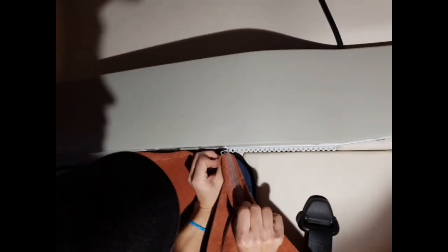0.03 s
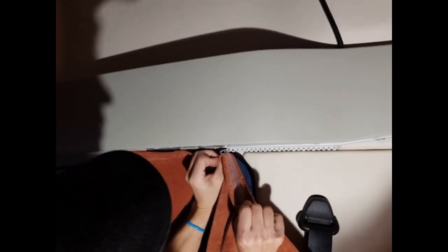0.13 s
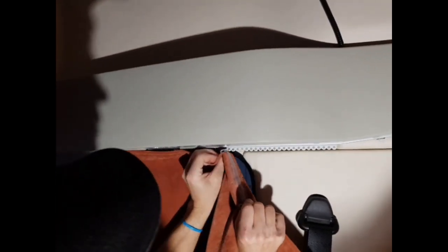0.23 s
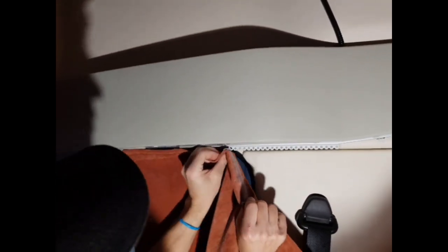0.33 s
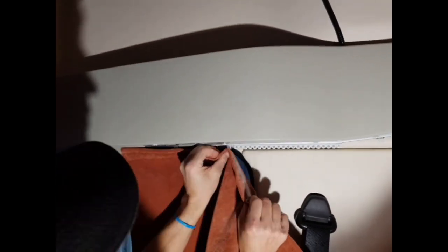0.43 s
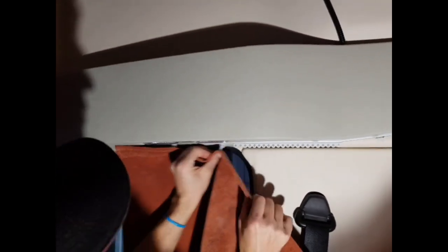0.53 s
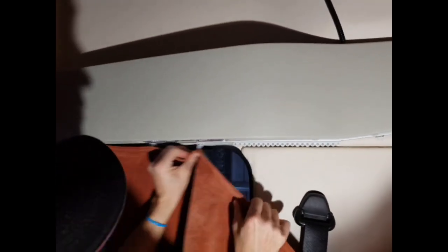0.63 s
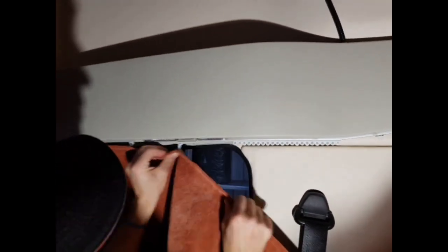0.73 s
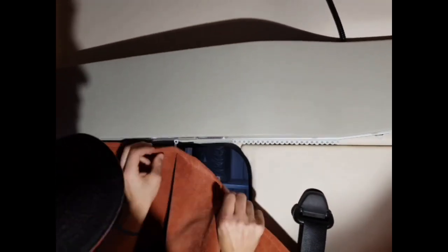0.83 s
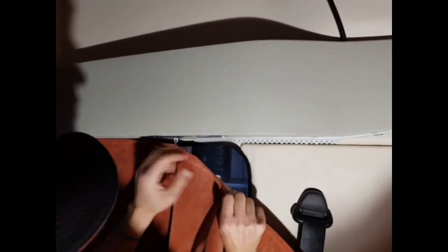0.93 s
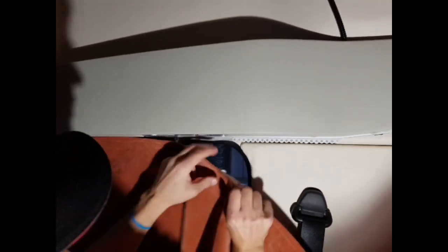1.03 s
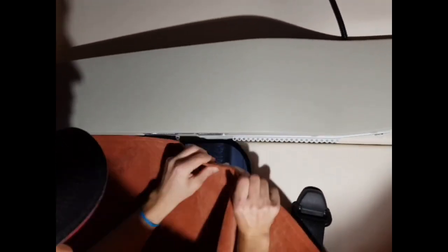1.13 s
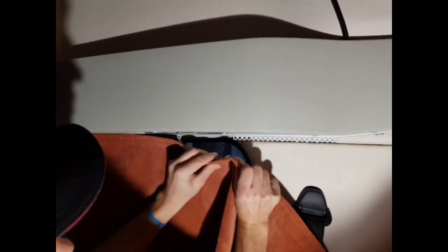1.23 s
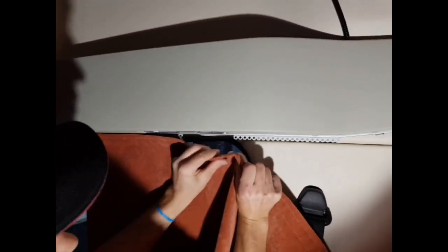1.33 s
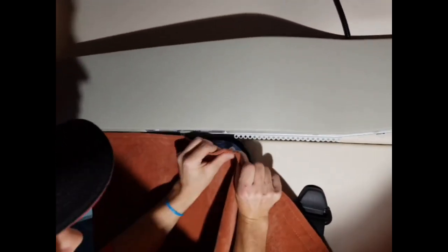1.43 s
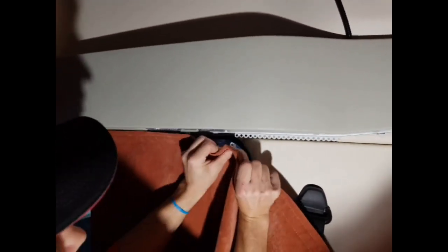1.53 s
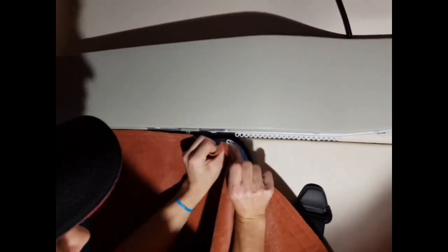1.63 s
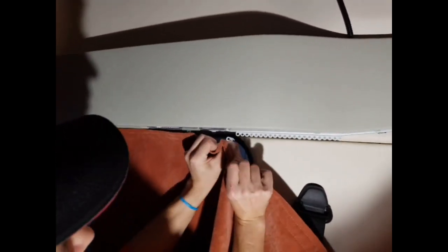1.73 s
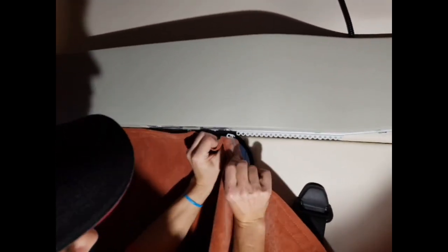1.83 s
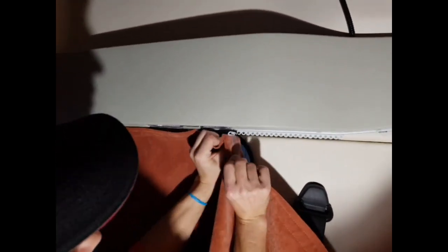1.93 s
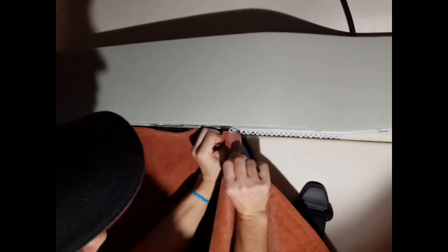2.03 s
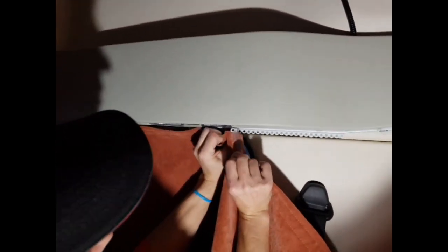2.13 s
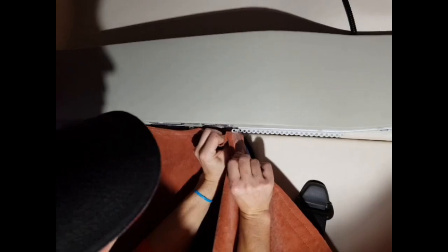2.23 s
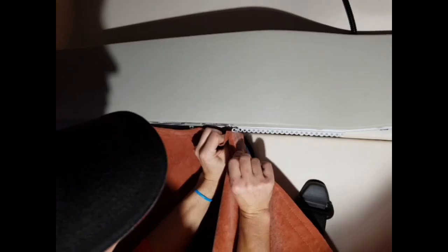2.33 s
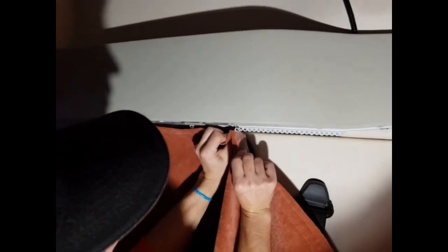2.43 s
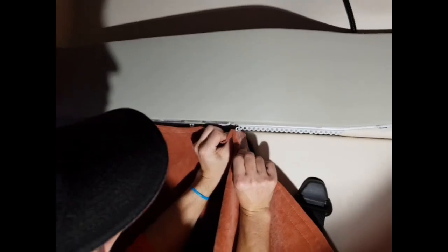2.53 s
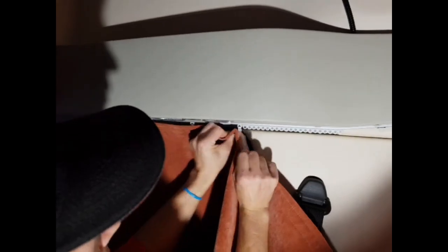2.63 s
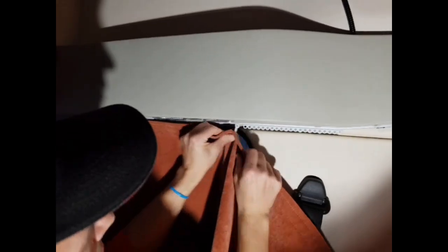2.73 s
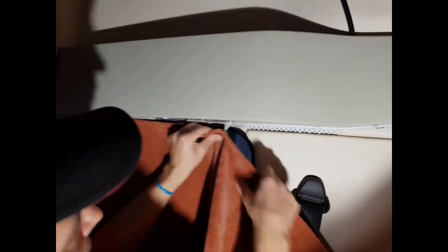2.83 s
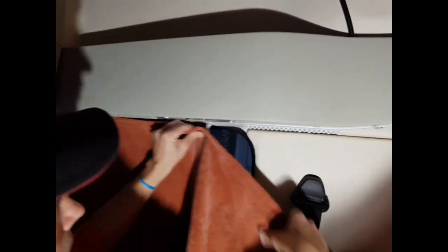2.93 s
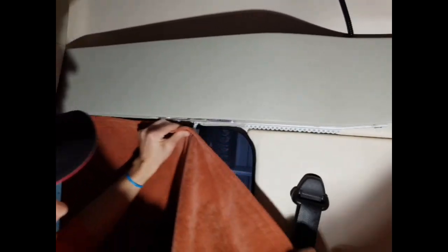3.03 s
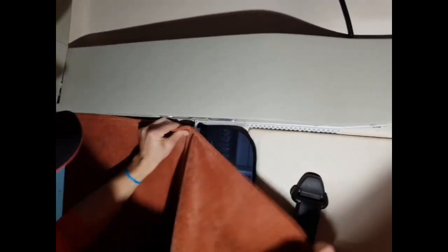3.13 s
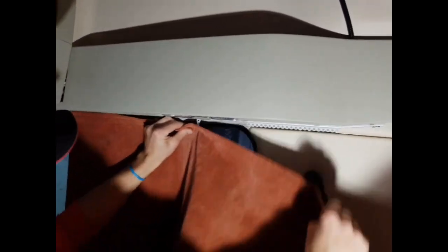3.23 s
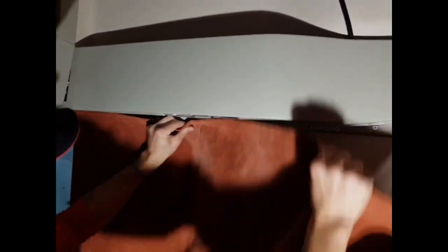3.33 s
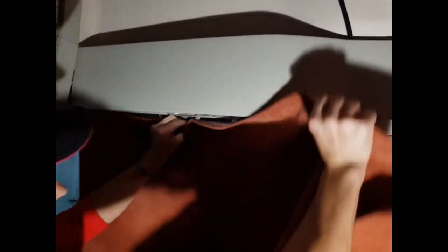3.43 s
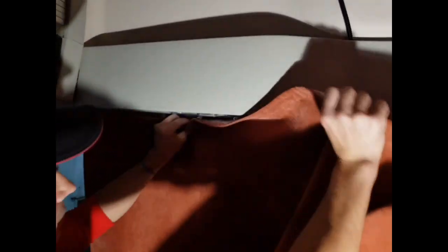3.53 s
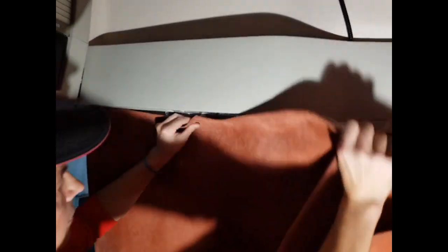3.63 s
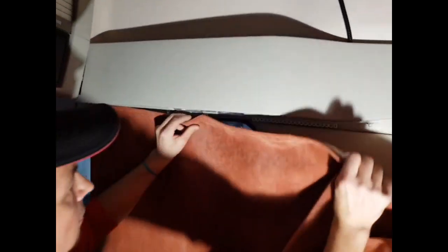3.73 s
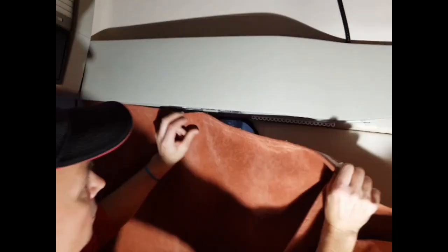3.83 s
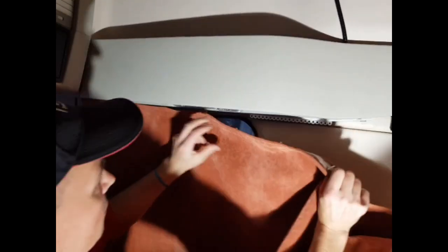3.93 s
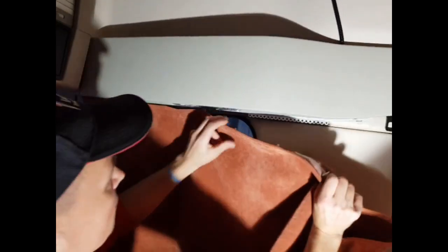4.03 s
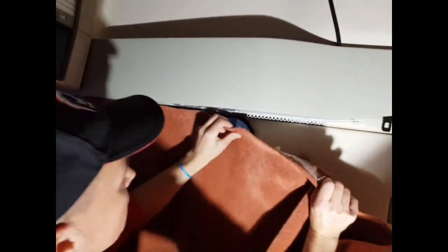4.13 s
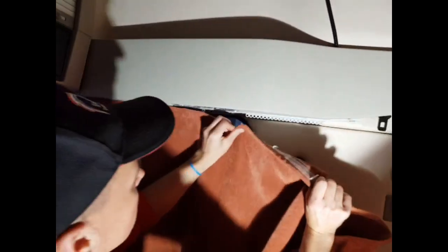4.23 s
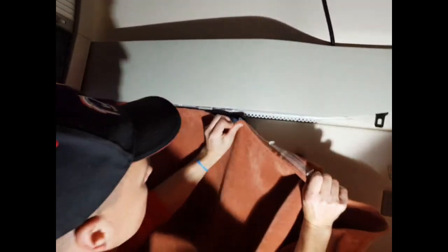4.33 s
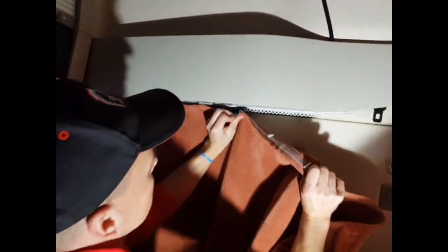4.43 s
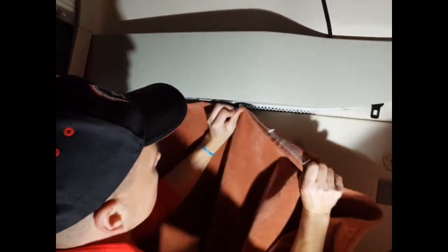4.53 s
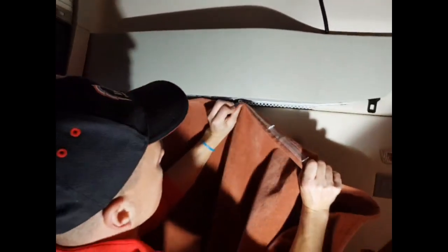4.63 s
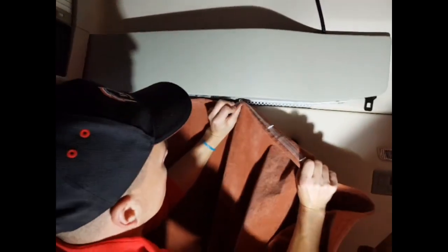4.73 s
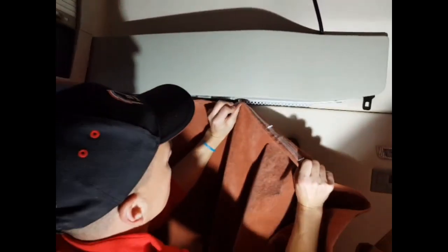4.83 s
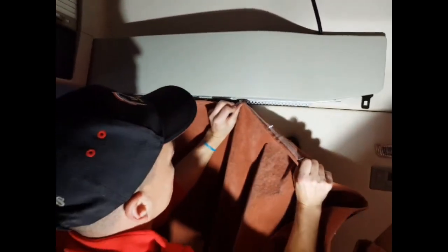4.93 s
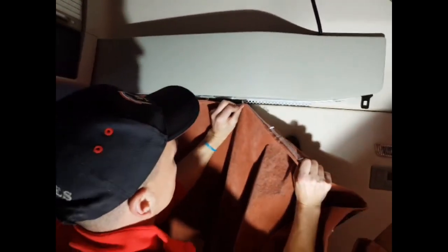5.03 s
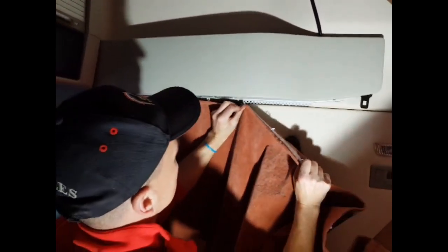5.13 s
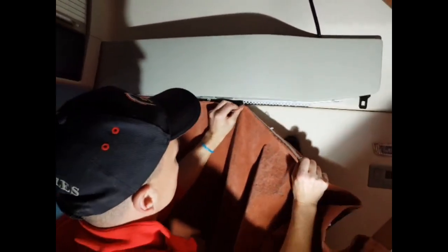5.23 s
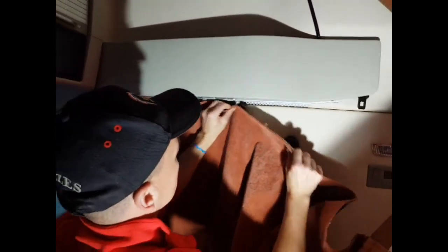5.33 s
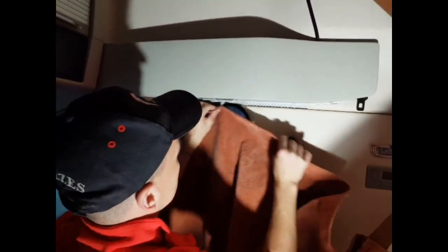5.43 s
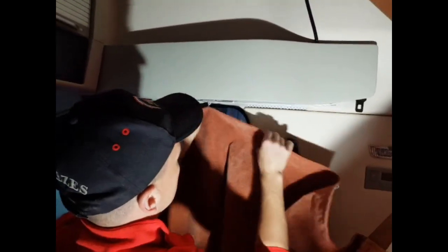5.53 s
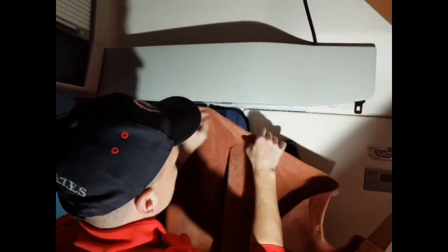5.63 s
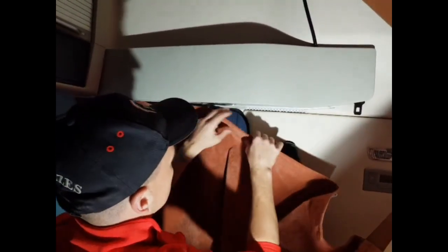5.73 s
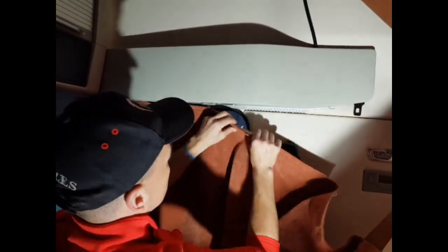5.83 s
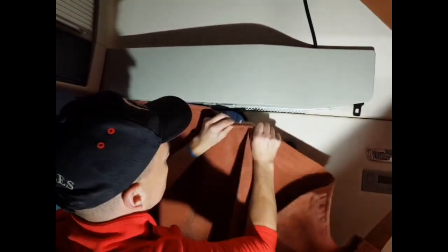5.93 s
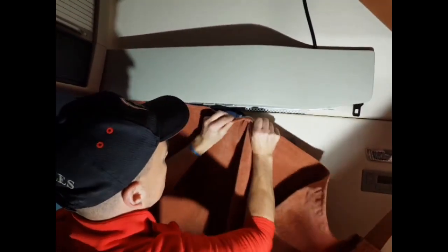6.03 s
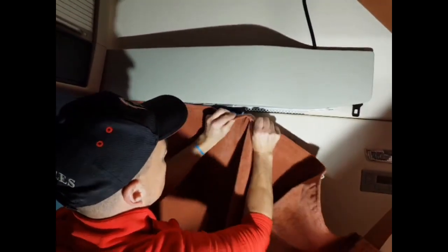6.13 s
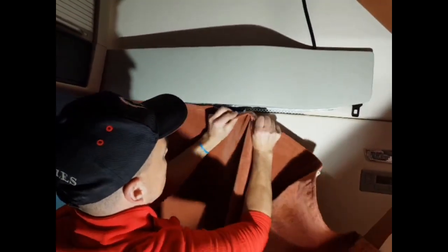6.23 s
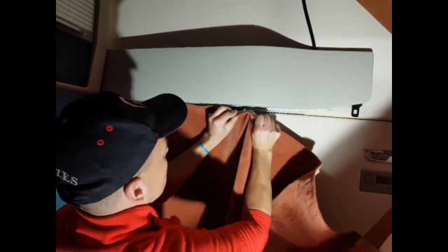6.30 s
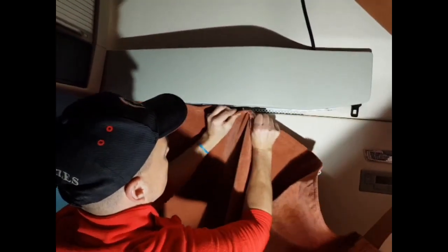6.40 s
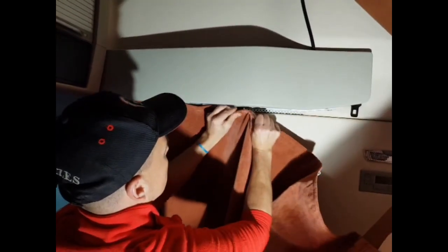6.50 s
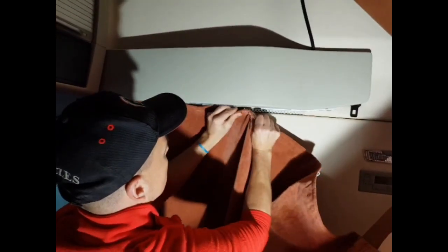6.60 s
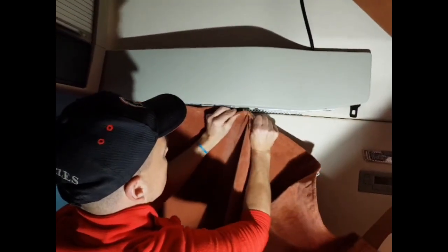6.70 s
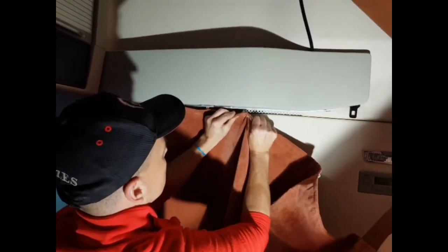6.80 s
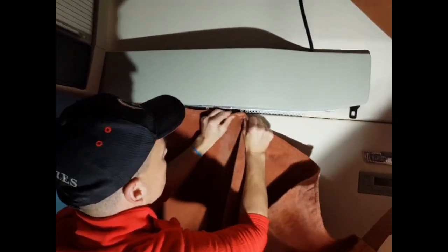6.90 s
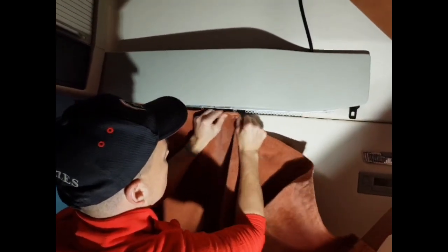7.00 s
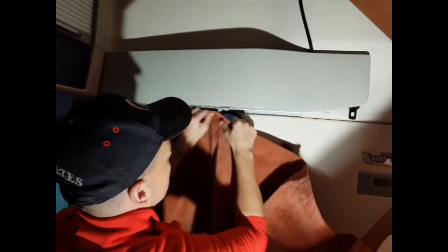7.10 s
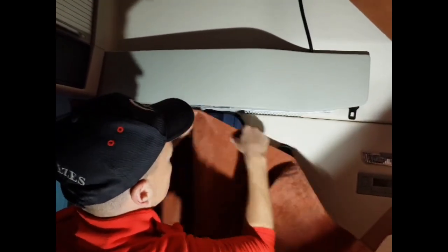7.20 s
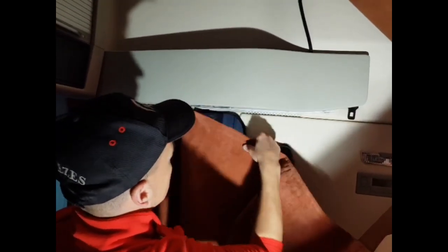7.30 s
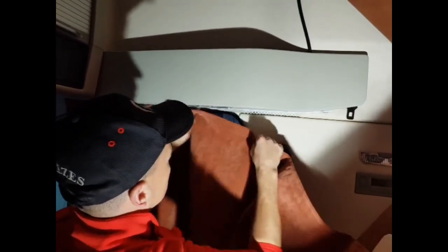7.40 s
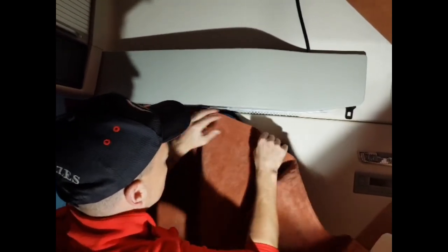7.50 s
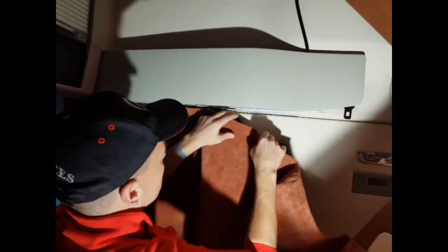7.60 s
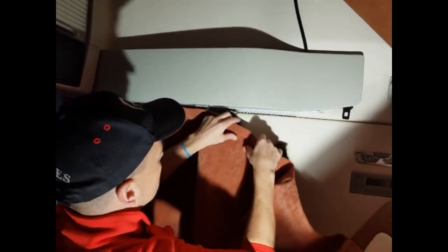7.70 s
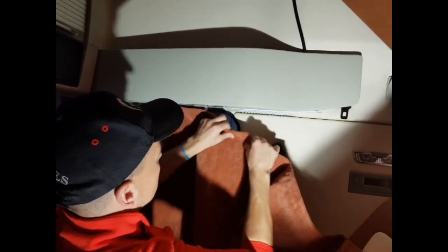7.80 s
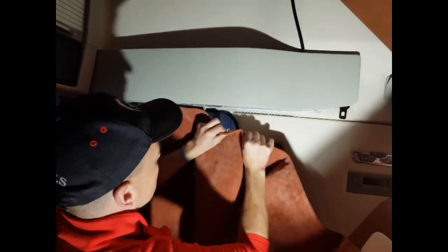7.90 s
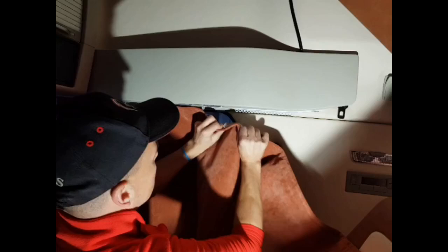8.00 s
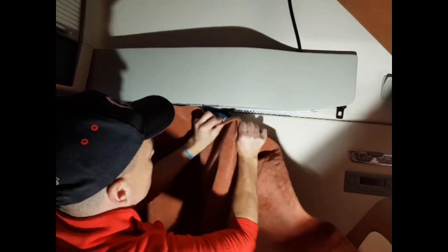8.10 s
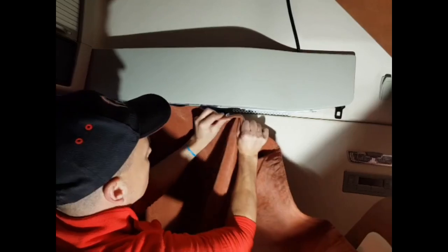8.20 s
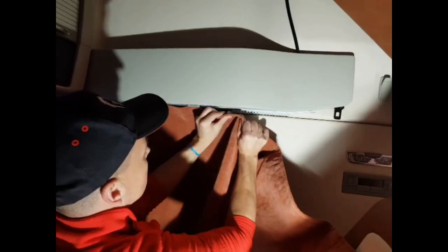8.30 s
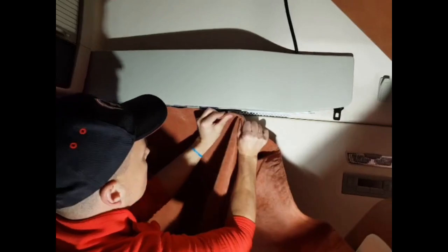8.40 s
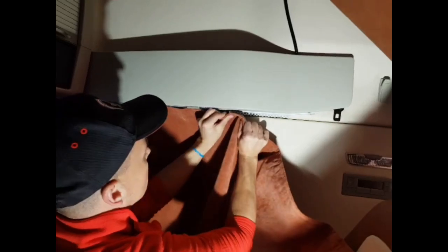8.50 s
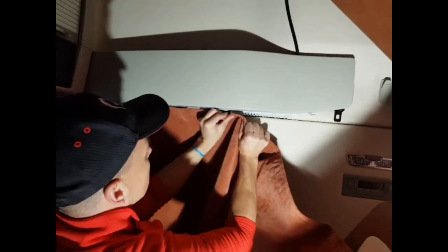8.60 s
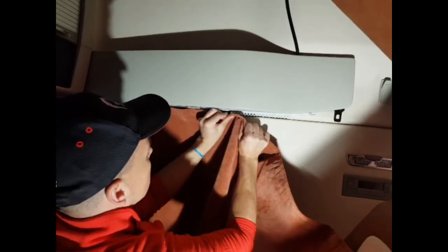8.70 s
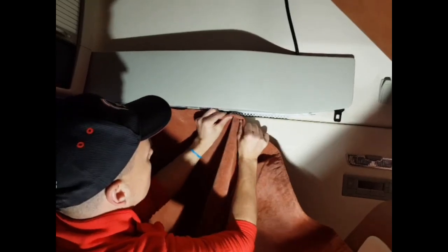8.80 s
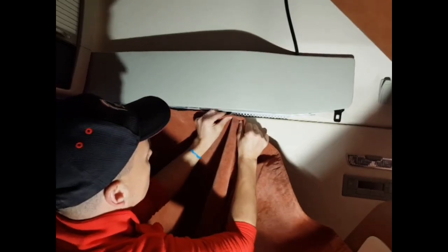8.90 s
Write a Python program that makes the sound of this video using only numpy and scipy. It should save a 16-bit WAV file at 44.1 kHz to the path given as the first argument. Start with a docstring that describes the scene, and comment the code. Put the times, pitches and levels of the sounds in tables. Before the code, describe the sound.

Close stereo sound of someone hanging a thick curtain: small plastic clicks and scuffs, then crisp chattering snaps with a hollow panel knock behind them. Most hard snaps are followed by a brief rasp of the hook along its slot, stuttering as it slows. Fabric brushes and folds between them, thumping softly near the first third. The upholstered cabin gives a very short reverberation; a quiet steady rumble lies underneath, and the end settles into light ticks and rustle.

```python
"""Plastic curtain hooks tick on a rail and snap into its slot in a small, padded van cabin.
Snaps are chattering bursts with rail rings plus a panel knock; slides are rasp, zip and stick-slip judder.
Thick cloth rustles and brushes as random friction grains, creaks as narrow noise and thumps as low pushes
with slaps. Underneath: a low steady rumble with faint hiss, and late on two decaying low tones."""
import sys
import numpy as np
from scipy import signal
from scipy.fft import rfft, irfft, next_fast_len
from scipy.io import wavfile

SR = 44100
rng = np.random.default_rng(int(sys.argv[2]) if len(sys.argv) > 2 else 0)


def store_pcm(level_fs):
    """Save levels as 16-bit WAV."""
    pcm = np.round(np.clip(level_fs, -1, 1) * 32767).astype(np.int16)
    wavfile.write(sys.argv[1], SR, np.atleast_2d(pcm).T)


N = 394781
TIME = np.arange(N) / SR
HIT = TIME[:SR // 3]  # time axis of one short event
SPLIT_HZ, CUTOFF_HZ = 3890, 16000  # dull/bright crossover, top of the sound
CABIN_T60_S = 0.1

# sharp, short rings of hook and rail, nominal: [f/Hz, width/Hz, lift/dB]
RAIL_RINGS = [(4450, 1300, 7.5), (6130, 450, 6), (8950, 1200, 7.5), (13000, 1100, 3)]
# cloth friction spectrum before rings and band weights: [f/Hz, relative density/dB]
RUB_SPECTRUM = [(130, -25.5), (220, 3.5), (400, 1), (1000, -2), (3000, -11.5), (8700, -15), (16000, -13.5)]


def from_db(db):
    """Decibels to gain."""
    return 10 ** (np.asarray(db) / 20)


def rms_one(x):
    """Scale to unit rms."""
    return x / np.sqrt(np.mean(x ** 2) + 1e-20)


def freqs(size):
    """Frequencies of a real FFT in Hz, at least 1."""
    return np.maximum(np.fft.rfftfreq(size, 1 / SR), 1)


def at_hz(points, hz):
    """Read a spectrum on a log-frequency axis."""
    f, value = np.transpose(points)
    return np.interp(np.log(hz), np.log(f), value)


def band(x, low_hz, high_hz, order=2):
    """Causal band-pass."""
    edges_hz = [low_hz, min(high_hz, .45 * SR)]
    sos = signal.butter(order, edges_hz, "band", fs=SR, output="sos")
    return signal.sosfilt(sos, x + 1e-18)


def drift(rate, size=N):
    """Random values drawn `rate` times per second, joined by straight lines."""
    knots = rng.standard_normal(size // 20)
    return np.interp(TIME[:size] * rate, np.arange(len(knots)), knots)


def narrow_noise(phase, slip_rate):
    """Uneven slips spread a pitch into a narrow band."""
    parts = (drift(rate=slip_rate, size=len(phase)) * wave(phase) for wave in (np.sin, np.cos))
    return rms_one(sum(parts))


def add(out, s, sound):
    """Mix a sound in at a time."""
    i = max(round(s * SR), 0)
    out[:, i:i + sound.shape[1]] += sound[:, :N - i]


def colour(x, gain_db):
    """Causal (minimum-phase) filter with a given gain on the FFT grid."""
    size = x.shape[-1]
    cepstrum = irfft(np.log(from_db(gain_db)), size)
    cepstrum[..., 1:size // 2] *= 2
    cepstrum[..., size // 2 + 1:] = 0
    return irfft(rfft(x) * np.exp(rfft(cepstrum)), size)


def diffuse(size):
    """Stereo noise as a cabin delivers it: alike in the bass, nearly unrelated in the treble."""
    # left-right correlation: [f/Hz, likeness]
    likeness = [(80, .97), (550, .88), (850, .25), (4000, .03)]
    mid, side = rfft(rng.standard_normal((2, size)))
    alike = at_hz(likeness, freqs(size)).clip(-1, 1)
    spectra = np.sqrt(1 + alike) * mid + np.sqrt(1 - alike) * side * [[1], [-1]]
    return irfft(spectra, size) / np.sqrt(2)


def peak(hz, centre_hz, width_hz):
    """Shape of one resonance, 1 on top."""
    return 1 / (1 + (2 * (hz - centre_hz) / width_hz) ** 2)


def rings_db(rings, hz):
    """Lift from a set of resonances; their pitch and strength vary with the spot touched."""
    detune, uneven = .025, .4
    total_db = 0
    for f, width, lift in rings:
        spot_lift = lift * (1 + uneven * rng.uniform(-1.5, 1))
        spot_hz = f * (1 + detune * rng.uniform(-1, 1))
        total_db = total_db + spot_lift * peak(hz, spot_hz, width)
    return total_db


def channels_db(hz):
    """Left and right each have a colour of their own."""
    # level balance: [f/Hz, left minus right/dB]
    balance = [(700, 2), (1600, -3.5), (3000, -1), (4700, 5.5), (5900, -7.5), (7700, -7), (8600, 4.5),
               (9700, 4.5), (12000, -3.5), (15000, -5.5)]
    return at_hz(balance, hz) * np.array([[.5], [-.5]])


def comb_db(hz, depth_db):
    """Near walls reinforce some frequencies and cancel others, differently at each spot and channel."""
    delays_s = np.geomspace(.0002, .009, 12)[:, None] * rng.uniform(.5, 1, (2, 12, 1))
    grid_hz = np.linspace(0, SR / 2, 2000)
    combs = np.cos(2 * np.pi * (grid_hz * delays_s + rng.random((12, 1)))).sum(axis=1)
    return depth_db * np.array([np.interp(hz, grid_hz, rms_one(comb)) for comb in combs])


def cabin(rise_s, t60):
    """Dense reflections build up and die fast in the upholstery; a faint tail stays."""
    tail_db, tail_t60_s = -43.0, 0.98
    decay = from_db(-60 * HIT / t60) + from_db(tail_db - 60 * HIT / tail_t60_s)
    return diffuse(len(HIT)) * (1 - np.exp(-HIT / rise_s)) * decay


def friction(spectrum, per_s, spread_db, rail_share, depth_db):
    """Fibres and edges catch at random; the cabin smears each crisp grain and the rail colours it."""
    catch_s, direct_share = .0012, .42  # decay of a catch's power, share of power arriving directly
    size = next_fast_len(N, True)
    hz, spots = freqs(size), []
    for _ in range(3):
        strength_db = spread_db * np.minimum(rng.exponential(1, size), 3)
        catches = (rng.random(size) < per_s / SR) * from_db(strength_db) ** 2
        direct = signal.lfilter([1], [1, -np.exp(-1 / (catch_s * SR))], catches)
        smeared = signal.lfilter([1], [1, -from_db(-60 / (CABIN_T60_S * SR)) ** 2], catches)
        power = direct_share * direct / direct.mean() + (1 - direct_share) * smeared / smeared.mean()
        rail_db = rail_share * rings_db(RAIL_RINGS, hz)
        gain = from_db(at_hz(spectrum, hz) + rail_db + channels_db(hz) + comb_db(hz, depth_db))
        spots.append(irfft(rfft(diffuse(size) * np.sqrt(power)) * gain, size)[:, :N])
    # the contact wanders between spots that sound different
    weights = np.array([from_db(13 * drift(rate=14)) for _ in spots])
    weights /= np.linalg.norm(weights, axis=0)
    return sum(weight * spot for weight, spot in zip(weights, spots))


def two_bands(noise, low_hz, dull, bright, top_hz=12500, lumps_db=-0.77):
    """Weigh the dull and the bright half of a rubbing sound; the dull half is lumpy."""
    lumpy = band(noise, low_hz, SPLIT_HZ, order=3) * from_db(lumps_db * drift(rate=160))
    crisp = band(noise, SPLIT_HZ, top_hz, order=3)
    return dull * rms_one(lumpy) + bright * rms_one(crisp)


def background(level_db=-52, hiss_lift_db=6):
    """Steady shaped noise, low rumble and faint hiss, plus low tones that start softly and decay."""
    # rumble and hiss spectrum before the hiss lift: [f/Hz, relative density/dB]
    hush = [(20, -14), (55, 0), (105, -7.5), (170, -21.5), (400, -34), (1200, -41.5), (3000, -47.5),
            (7500, -49), (12000, -45), (16000, -46)]
    # decaying tones, level before rise and decay: [t/s, f/Hz, level/dB, t60/s]
    sway = [(8.384, 32.33, -34, 1.97), (8.389, 43.8, -25.5, 0.15)]
    size = next_fast_len(N, True)
    hz = freqs(size)
    noise = colour(diffuse(size), at_hz(hush, hz) + hiss_lift_db * peak(hz, 5500, 1200))
    out = from_db(level_db) * rms_one(noise[:, :N])
    for s, tone_hz, db, t60 in sway:
        age = (TIME - s).clip(0)
        swell = from_db(db - 60 * age / t60) * (1 - np.exp(-age / 0.011))
        out += swell * np.sin(2 * np.pi * tone_hz * age)
    return out


def cloth_moves():
    """Rub and swish gains; each gathering or shift of the cloth swells and ebbs in a rounded arch."""
    # moves, levels before the layer gains: [t/s, length/s, rub level/dB, swish re rub/dB]
    moves = [(0.0, 0.58, -65, -5.5), (0.67, 0.18, -56, -2), (0.977, 0.41, -60, -7), (1.439, 0.19, -64, -6),
             (1.6, 0.37, -71.5, -4.5), (3.026, 0.5, -55, -13.5), (3.368, 0.11, -54.5, -3.5),
             (3.472, 0.43, -60.5, -7), (3.914, 0.93, -69.5, -6), (5.5, 0.2, -62.5, -11),
             (5.69, 0.65, -67, -6.5), (6.713, 0.1, -60.5, -23), (7.191, 0.42, -59, -4),
             (7.592, 0.53, -72, -7), (8.523, 0.46, -64.5, -10.5)]
    flatness = 4.6
    rub, swish = np.zeros((2, N))
    for s, length_s, db, bright_db in moves:
        from_middle = np.abs(2 * (TIME - s) / length_s - 1).clip(0, 4)
        gain = from_db(db) * np.exp(-from_middle ** flatness)
        rub += gain
        swish += gain * from_db(bright_db)
    return rub, swish


def cloth(swish_db=9, rub_db=4, uneven_db=3.5):
    """Folds rub over each other and along the rail, catching unevenly."""
    rub, swish = cloth_moves()
    grains = friction(RUB_SPECTRUM, per_s=330, spread_db=4.6, rail_share=.9, depth_db=3)
    rustle = two_bands(grains, 65, from_db(rub_db) * rub, from_db(swish_db) * swish)
    return rustle * from_db(uneven_db * drift(rate=20))


def scuffs(swish_db=-11, rub_db=-14, swell_s=0.022, lead_s=0.015):
    """Hooks and hem brush the rail; each brush swells and fades within a few hundredths of a second."""
    # brushes, level before the layer gains: [t/s, level/dB, extra rub/dB]
    brushes = [(1.495, -38.5, -4), (2.3524, -46, -1), (2.578, -32, 2), (3.675, -41, -4), (4.021, -47, 3),
               (4.321, -46, -6), (4.542, -31, -2), (4.691, -41.5, -4.5), (4.989, -30.5, -4.5),
               (5.029, -32, 4.5), (6.083, -39, -0.5), (6.205, -43, 3.5), (6.589, -37, -0.5),
               (6.798, -35.5, 5.5), (8.539, -43, -3)]
    touch = np.zeros((2, N))  # rub and swish gains
    stroke = HIT / swell_s * np.exp(1 - HIT / swell_s)
    for s, level_db, extra_db in brushes:
        gains_db = [[level_db + extra_db + rub_db], [level_db + swish_db]]
        add(touch, s - lead_s, from_db(gains_db) * stroke)
    grains = friction(RUB_SPECTRUM, per_s=2300, spread_db=11, rail_share=1.0, depth_db=3.5)
    return two_bands(grains, 450, *touch)


def creaks(spread=.28):
    """Short narrow tones: the cloth creaks, and during slides the judder sings overtones; uneven slips spread
    each into a narrow band for a moment."""
    # creaks: [centre t/s, f/Hz, level/dB, Gaussian sigma/s]
    slips = [(.575, 440, -42, .035), (1.594, 800, -54, .005), (5.572, 1430, -47, .025),
             (7.095, 640, -46.5, .025), (7.22, 590, -42, .035), (7.76, 950, -62, .03),
             (8.62, 500, -53, .016), (8.81, 2050, -65, .035), (8.85, 2720, -66, .03)]
    out, middle_s = np.zeros((2, N)), HIT.mean()
    for s, hz, db, sigma_s in slips:
        swell = from_db(db) * np.exp(-.5 * ((HIT - middle_s) / sigma_s) ** 2)
        creak = swell * narrow_noise(2 * np.pi * hz * HIT, spread * hz)
        add(out, s - middle_s, creak[None])
    return out


def thumps(push_db=-7, slap_db=-6, hardest_hz=12000, hardness=0.63):
    """Taut cloth and hands on the wall: one low push of air and a slap, duller when softer."""
    # thumps, levels before the push and slap gains: [t/s, level/dB, slap re level/dB]
    bumps = [(1.146, -30.5, -20), (1.19, -41.5, -7), (3.127, -28.5, -6.5), (3.2048, -20.5, -4.5),
             (3.392, -22, -23), (3.427, -29.5, -16), (3.463, -34, 1), (5.916, -39, -8)]
    # slap spectrum before the band-pass: [f/Hz, relative density/dB]
    slap_spectrum = [(200, -20), (600, 8.5), (1000, -2), (2000, -12), (5000, -46)]
    out = np.zeros((2, N))
    for s, level_db, rel_db in bumps:
        shove = np.exp(-HIT / 0.0018) * 1.38 + cabin(rise_s=0.00088, t60=0.22)
        push = band(shove, 52, 272)
        slap = colour(cabin(rise_s=0.00068, t60=0.071), at_hz(slap_spectrum, freqs(len(HIT))))
        slap = band(slap, 16, hardest_hz * from_db(hardness * (level_db + rel_db)), order=3)
        push *= from_db(push_db) / push[:, HIT < .02].std()
        slap *= from_db(rel_db + slap_db) / slap[:, HIT < .02].std()
        add(out, s, from_db(level_db) * (push + slap))
    return out


def pull_speed(start_s, rise_s, hold_s, release_s):
    """The hand speeds up, holds and slows to rest: 0 to 1."""
    age = TIME - start_s
    slowing = (age - rise_s - hold_s).clip(0) / release_s
    return (age / rise_s).clip(0, 1) * np.exp(-2 * slowing ** 2)


def pulls():
    """Hiss, scrape and judder gains and zip pitch, each following a power of a wavering speed; judder
    steadiness is set per stroke from its start onward."""
    # pulls, levels before the layer gains: [t/s, rise/s, hold/s, release/s, hiss/dB, scrape/dB, judder/dB,
    # judder fade/(dB/s), judder steadiness 0-1, zip f at unit speed/Hz]
    strokes = [(0.495, 0.096, 0.0067, 0.14, -37, -39.5, -35, 28, 0.09, 8400),
               (2.687, 0.21, 0.064, 0.14, -39, -37.5, -35, 1.5, 1, 8900),
               (5.229, 0.13, 0.17, 0.1, -43, -43, -37, 48, 0.14, 11100),
               (6.956, 0.12, 0.13, 0.095, -49.5, -43, -35, 36, 0.9, 9650)]
    hiss_power, scrape_power, judder_power, zip_power = 0.99, 0.72, 0.91, 0.085
    hiss, scrape, judder, steady, zip_hz = np.zeros((5, N))
    uneven = from_db(1.9 * drift(rate=22))
    for (s, rise_s, hold_s, release_s, hiss_db, scrape_db, judder_db,
         fade_db_per_s, steadiness, top_hz) in strokes:
        speed = pull_speed(s, rise_s, hold_s, release_s) * uneven
        faded_db = judder_db - fade_db_per_s * (TIME - s).clip(0, 1)
        hiss += from_db(hiss_db) * speed ** hiss_power
        scrape += from_db(scrape_db) * speed ** scrape_power
        judder += from_db(faded_db) * speed ** judder_power
        steady[TIME >= s] = np.clip(steadiness, 0, 1)
        zip_hz += top_hz * speed ** zip_power
    return hiss, scrape, judder, steady, zip_hz


def slides(hiss_db=0.0, scrape_db=-1.5, judder_db=-1, rumble_db=-1, jitter=0.03326,
           overtone_db=-15, zip_db=-8):
    """The hook rasps along the slot, zips higher with speed, and sticks and slips in a rumble or hum."""
    # rasp spectrum before rings and band weights: [f/Hz, relative density/dB]
    rasp_spectrum = [(180, 9), (320, -7.5), (500, 1.5), (800, -3.5), (2000, -8), (4400, -20.5),
                     (7300, -18.5), (12900, -21.5), (16000, -41)]
    # stick-slip rate before jitter: [t/s, f/Hz]
    slip_rate = [(.52, 220), (.75, 271.7), (2.79, 231.3), (2.914, 259), (2.978, 223.4), (3.04, 290),
                 (5.28, 229.5), (5.45, 172.2), (6.98, 118), (7.2, 94.6)]
    grains = friction(rasp_spectrum, per_s=1600, spread_db=1.5, rail_share=0.91, depth_db=4.5)
    hiss, scrape, shake, steady, zip_hz = pulls()
    rasp = two_bands(grains, 162, from_db(scrape_db) * scrape, from_db(hiss_db) * hiss, top_hz=16900)
    zip_phase = 2 * np.pi * np.cumsum(zip_hz) / SR
    zipping = np.array([narrow_noise(zip_phase, 2000) for _ in range(2)])
    slip_hz = np.interp(TIME, *np.transpose(slip_rate)) * (1 + jitter * drift(rate=24))
    phase = 2 * np.pi * np.cumsum(slip_hz) / SR
    tones = np.sin(phase) + from_db(overtone_db) * np.sin(2 * phase)
    hum = rms_one(tones * from_db(2.0 * drift(rate=57)))
    # uneven slips spread the hum and its octave into a low rumble
    rumble = rms_one(sum(narrow_noise(k * phase, 140) / k ** 2.36 for k in (1, 2)))
    steady_part = from_db(judder_db) * np.sqrt(steady) * hum
    uneven_part = from_db(rumble_db) * np.sqrt(1 - steady) * rumble
    return rasp + from_db(zip_db) * hiss * zipping + shake * (steady_part + uneven_part)


def chatter(crack_s=0.00077, gap_s=.0016, rebound=0.52, count=5):
    """A hook seats in a quick, uneven run of mostly weakening contacts."""
    gaps = gap_s * 2 ** rng.uniform(-0.61, 1, (count, 1))
    age = HIT - (np.cumsum(gaps, axis=0) - gaps)
    strength = rebound ** (np.arange(count)[:, None] * rng.uniform(.5, 1, (count, 1)))
    return (strength * (age >= 0) * np.exp(-np.abs(age) / crack_s)).sum(axis=0)


def snaps(crack=2.5, bright_db=-10, soft_db=0.38, depth_db=2.5, knock_db=-22, knock_follows=0.83):
    """A hook springs past the lip and chatters into its seat; rail rings, panel behind knocks."""
    # hook clicks, levels before the tick and knock gains: [t/s, level/dB, extra panel knock/dB]
    clicks = [(0.187, -52.5, 13.5), (0.2729, -27, 7), (0.361, -46.5, 15.5), (0.4436, -9, 0),
              (0.9815, -45.5, -5), (1.061, -46, 4.5), (1.121, -56, 0), (1.276, -34, 2.5), (1.312, -38.5, 4),
              (1.472, -38.5, -3), (1.538, -38.5, 0.5), (1.567, -52, 7), (1.784, -26, -3.5),
              (2.3952, -18.5, 4), (2.605, -6, 0.5), (3.332, -17, 1.5), (3.683, -23.5, -5), (4.356, -35, 4),
              (4.459, -35.5, -4.5), (4.478, -29, -5), (4.548, -30, -10), (4.739, -39.5, -9),
              (4.995, -24, -0.5), (5.0602, -8, 2), (5.249, -49.5, 14), (5.964, -34.5, -4),
              (6.059, -42, -20), (6.194, -43, -13), (6.654, -5.5, 1), (6.8171, -4, -0.5),
              (6.9151, -18.5, 3), (7.344, -46, 4), (7.479, -39.5, 3.5), (7.574, -55.5, 16.5),
              (8.1557, -28.5, 0), (8.6298, -31, 0)]
    # click spectrum before rings: [f/Hz, relative density/dB]
    click_spectrum = [(150, -11.5), (500, -13.5), (2000, -18.5), (3100, -15.5), (5200, -9.5), (9000, -2.5),
                      (12500, -0.5), (15500, -12)]
    # hollow rings of the panel behind the rail, nominal: [f/Hz, width/Hz, lift/dB]
    panel_rings = [(545, 210, 8), (1204, 420, 8), (2130, 720, 12.5)]
    # extra lift of the panel's lowest ring, which depends on the spot: [t/s, lift/dB]
    boom = [(0.44, -4), (6.8, 3.5), (8.15, -4)]
    out, hz, onset = np.zeros((2, N)), freqs(len(HIT)), HIT < .01
    for s, level_db, extra_db in clicks:
        body_db = at_hz(click_spectrum, hz) + rings_db(RAIL_RINGS + panel_rings, hz)
        body_db = body_db + channels_db(hz) + comb_db(hz, depth_db)
        burst = crack * chatter() * diffuse(len(HIT)) + cabin(rise_s=0.0016, t60=CABIN_T60_S)
        dulling_db = soft_db * level_db * (hz / CUTOFF_HZ) ** 2  # softer ticks lose treble
        tick = band(colour(burst, body_db + dulling_db), SPLIT_HZ, SR / 2)
        boom_db = np.interp(s, *np.transpose(boom)) * peak(hz, *panel_rings[0][:2])
        knock = band(colour(cabin(rise_s=0.0018, t60=0.11), body_db + boom_db), 240, SPLIT_HZ)
        tick *= from_db(level_db + bright_db) / tick[:, onset].std()
        # the knock grows more slowly than the click, so light touches sound duller
        knock_level_db = knock_db + knock_follows * level_db + extra_db
        knock *= from_db(knock_level_db) / knock[:, HIT < .02].std()
        add(out, s, tick + knock)
    return out


def scene():
    """Everything heard in the cabin."""
    return background() + cloth() + scuffs() + creaks() + thumps() + slides() + snaps()


def record(dry):
    """The top is cut steeply."""
    return signal.sosfilt(signal.ellip(10, .1, 80, CUTOFF_HZ, fs=SR, output="sos"), dry)


dry = scene()
out = record(dry)
store_pcm(out)
```